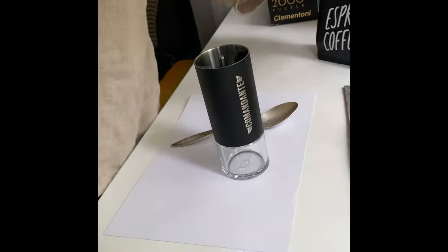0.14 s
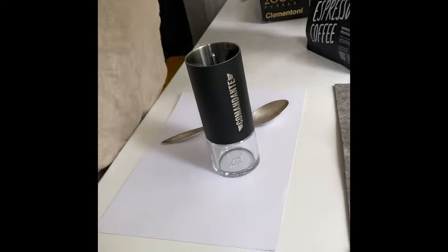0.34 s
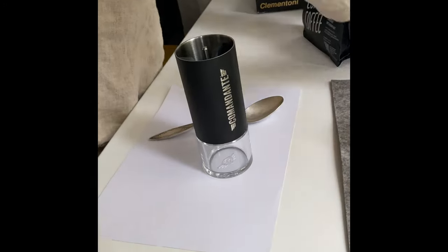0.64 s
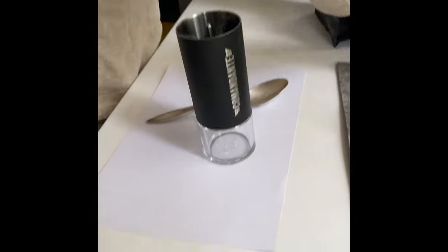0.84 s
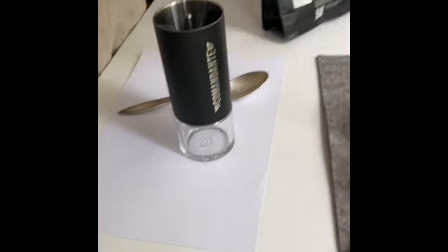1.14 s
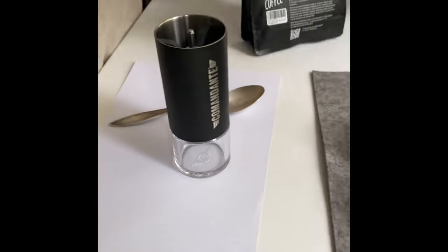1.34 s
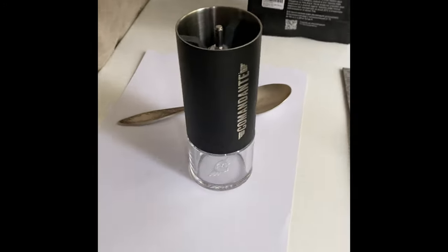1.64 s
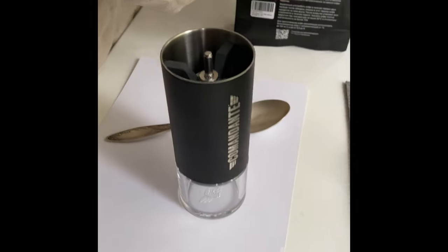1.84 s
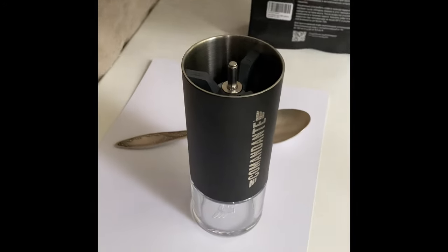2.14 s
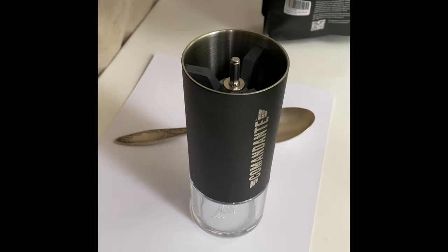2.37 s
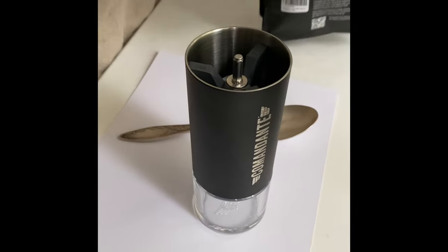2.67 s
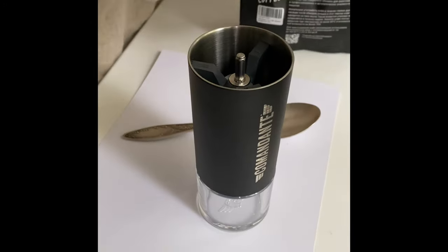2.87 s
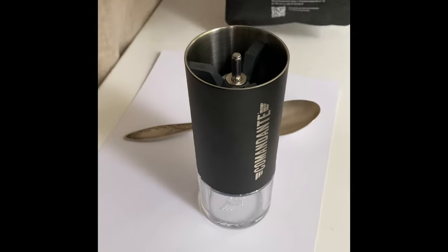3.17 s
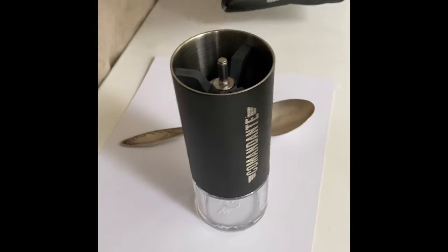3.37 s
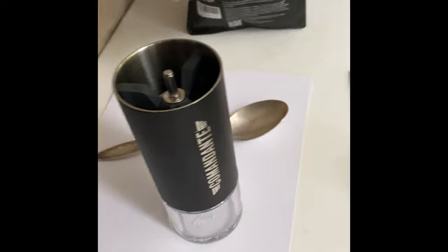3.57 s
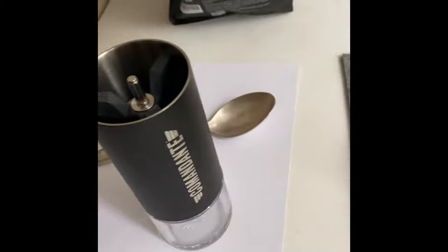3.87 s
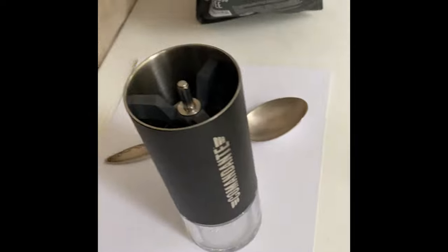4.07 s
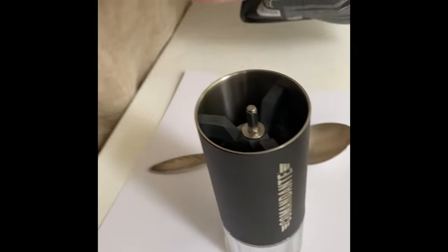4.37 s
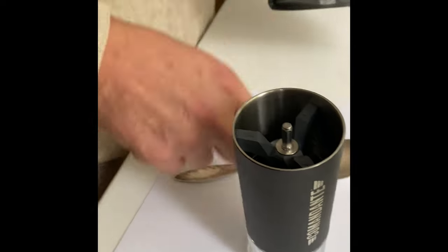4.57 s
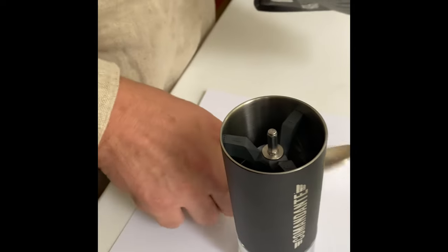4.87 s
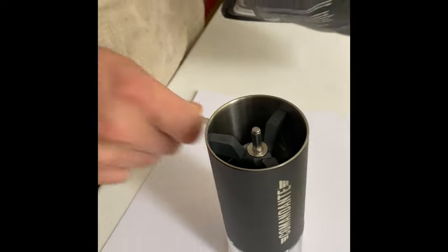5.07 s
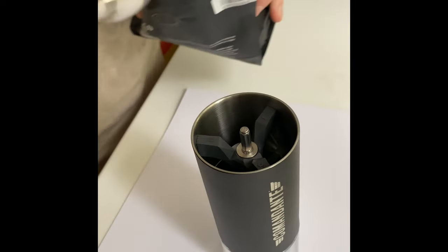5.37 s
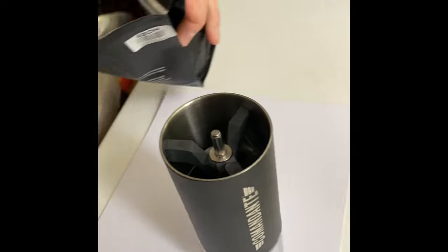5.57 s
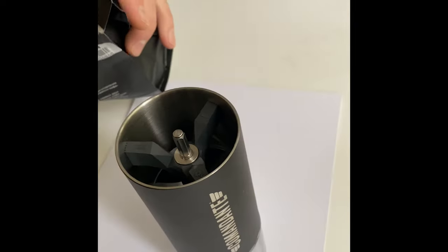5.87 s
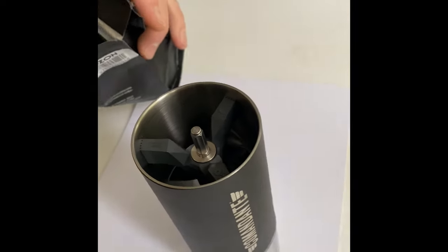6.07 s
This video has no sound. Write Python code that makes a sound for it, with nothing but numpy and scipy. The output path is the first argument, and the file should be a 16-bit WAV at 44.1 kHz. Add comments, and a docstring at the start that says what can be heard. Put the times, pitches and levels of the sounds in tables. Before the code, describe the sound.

A stiff foil coffee bag crackles and snaps sharply close by, thumps onto a table, then a spoon digs in and beans rattle.

```python
"""Foil snaps and crinkles close by: a stiff bag of coffee beans is picked up, opened and shifted on a table.
Bursts of force ring resonances for the creases, decaying sines make panels boom and the table thud.
Then a spoon is lifted and pushed into the tipped bag; beans slide and rattle as streams of tiny clicks.
The place is a small room, with a hand grinder on the table and a phone with two microphone ports close by.
The ports hear direct sound shifted in phase, a quick spray of reflections, and the ring of the room."""
import sys
import numpy as np
from scipy import signal
from scipy.fft import rfft, irfft, next_fast_len
from scipy.io import wavfile
from scipy.ndimage import uniform_filter1d

SR = 44100
rng = np.random.default_rng(int(sys.argv[2]) if len(sys.argv) > 2 else 0)


def output_pcm(signal):
    """Save a mono or channel-first signal as 16-bit PCM at the path in sys.argv[1].

    Samples are clipped to [-1, 1] before scaling.
    """
    pcm = np.clip(np.atleast_2d(signal).T, -1, 1) * 32767
    wavfile.write(sys.argv[1], SR, np.round(pcm).astype(np.int16))


N = 273861  # length in samples

# Levels below are settings before the *_db trims of the functions that use them.
# sharp contacts, mostly foil snapping:
# [t/s, crack level/dB, crack f/Hz, treble re crack/dB, panel boom level/dB, panel f/Hz]
SNAPS = [(0.21, -18, 2600, -7.5, -35, 450), (0.27, -30, 1750, -21, -38, 406),
         (0.41, -26.5, 5070, 2.5, -34.5, 420), (0.445, -19, 1978, -22, -35, 572),
         (0.795, -20, 2830, -6, -31.5, 370), (0.8556, -14.5, 1162, -19.5, -24.5, 490),
         (0.8706, -18.5, 1260, -11, -27, 528), (0.88, -27.5, 1270, -42, -32, 487),
         (0.9014, -11.5, 2190, 0.5, -29.5, 640), (0.924, -30.5, 1700, -11, -42, 523),
         (0.935, -29.5, 930, -6, -32, 453), (0.943, -26, 1110, -24, -42, 586),
         (0.96, -25, 1037, -25, -40, 465), (0.978, -27, 1720, -5, -34.5, 423),
         (0.993, -22, 2350, -7, -37, 540), (1.095, -31, 2500, -60, -42.5, 426),
         (1.513, -28.5, 2320, -6, -31, 487), (1.599, -30, 2070, -45, -38.5, 393),
         (1.731, -33, 1910, -25, -39, 670), (1.694, -21.5, 3950, -51, -37.5, 386),
         (1.751, -32, 856, -20, -25.5, 403), (2.062, -19.5, 2060, -11.5, -31, 200),
         (2.17, -25.5, 2220, -29, -43, 396), (2.211, -25, 1290, -19, -30, 447),
         (2.223, -12, 3200, -16, -34, 202), (2.2517, -2.5, 4640, -8.5, -27, 380),
         (2.268, -18.5, 1270, -23, -28, 184), (2.321, -22.5, 2190, -36, -43.5, 400),
         (2.3408, -14, 2750, -30, -21.5, 347), (2.36, -12.5, 2060, -11, -28, 537),
         (2.391, -15.5, 3100, -13, -35.5, 460), (2.407, -16, 2670, -9, -37.5, 400),
         (2.41, -7, 2600, 1, -26, 253), (2.418, -38.5, 1480, -21.5, -27, 414),
         (2.461, -17, 2450, -46, -46, 259), (2.507, -30, 2200, -56, -41.5, 576),
         (2.793, -28.5, 2360, -11, -40.5, 406), (2.809, -33.5, 1880, -19, -30.5, 343),
         (2.843, -27.5, 2180, -46, -44.5, 172), (2.957, -36, 1144, -32, -31.5, 409),
         (3.246, -25.5, 2180, -28, -45, 190), (3.275, -23, 2970, -24.5, -31, 379),
         (3.29, -20.5, 2600, -35.5, -30.5, 238), (3.323, 0, 2712, -12, -21, 269),
         (3.3293, -16.5, 1166, -23.5, -26, 379), (3.358, -6, 2078, -3.5, -21.5, 271),
         (3.365, -16.5, 2400, -2, -28, 297), (3.506, -36.5, 1654, -38, -40, 504),
         (3.527, -32, 1110, -18, -35, 266), (3.56, -21, 3220, -10, -34, 541),
         (3.702, -23.5, 2380, -9, -31.5, 200), (4.1055, -5.5, 3500, -12, -49.5, 187),
         (4.125, -17, 2150, -14.5, -31, 241), (4.1672, -22.5, 3110, -46, -40.5, 166),
         (4.2075, -14, 2360, -15.5, -29, 223), (4.254, -23, 2570, -28, -40.5, 299),
         (4.284, -38.5, 1062, -11, -34, 403), (4.428, -25, 1560, -14, -25.5, 190.5),
         (6.167, -29.5, 1450, -4, -32, 144)]
# soft buckling of a bag panel: [t/s, level/dB, f/Hz]
BUCKLES = [(0.018, -32.5, 480), (0.192, -33, 480), (0.228, -30.5, 455), (0.274, -31.5, 233),
           (0.322, -27.5, 392), (0.387, -25, 467), (0.505, -29.5, 430), (0.658, -38, 376),
           (1.182, -31.5, 258), (1.3, -31, 183), (1.342, -31, 397), (1.512, -30, 394), (1.549, -33.5, 378),
           (1.926, -31.5, 350), (2.796, -26.5, 410), (3.054, -30, 374), (3.138, -32.5, 186),
           (3.229, -28, 200), (3.392, -30.5, 348.4)]
# modes of a buckling panel: [multiple of its f, level/dB, t60/s]
BOOM_MODES = [(.62, -1, 0.036), (1.001, 5.5, 0.046), (1.45, 6, 0.022), (2.1, -9, 0.038)]
# fingers squeezing the bag: [t/s, length/s, last crinkle level/dB, build-up/dB, crispness re crinkle/dB]
SQUEEZES = [(0.0, 0.0042, -39.5, -21, -10.5), (0.07, 0.118, -50.5, 4.5, -8), (0.176, 0.046, -40, 15, -5),
            (0.276, 0.19, -50.5, -4.5, -4), (0.612, 0.24, -48.5, 7.5, -4), (0.864, 0.026, -31.5, 0.5, -9),
            (0.895, 0.094, -38.5, -1, -3.5), (1.11, 0.45, -40.5, 13, -4), (1.634, 0.21, -57, -7.5, -3),
            (1.876, 0.38, -52.5, 0.5, -2.5), (2.205, 0.2, -37, 4, -7.5), (2.448, 0.0772, -47, -1.5, -14.5),
            (2.63, 0.17, -44.5, 4, -5.5), (2.966, 0.0785, -43.5, 18, -8.5),
            (3.118, 0.099, -54.5, -5, -11.5), (3.208, 0.16, -36, 10.5, -2), (3.491, 0.098, -43.5, 10, -9.5),
            (3.684, 0.15, -52.5, -8, -9.5), (3.952, 0.15, -59.5, -1.5, -3), (4.09, 0.064, -44.5, -5, -6),
            (4.189, 0.027, -41, 1, -10.5), (4.299, 0.024, -49.5, 14.5, 3), (4.402, 0.015, -43, 31, -13.5),
            (4.561, 0.19, -68, -10, -7), (4.849, 0.22, -61.5, 10, 6), (5.027, 0.32, -61.5, 6, -3.5),
            (5.429, 0.093, -72.5, -2, 13), (5.555, 0.095, -49.5, 0.5, -4.5)]
# colouring of the foil creases: [f/Hz, level/dB]
FOIL = [(300, 4), (700, 4), (1300, 0), (2600, 2), (3700, -9.5), (6000, -20)]
# colouring of the finest, crisp creases: [f/Hz, level/dB]
CRISP = [(2000, -2.5), (3600, 2), (5200, -0.5), (6400, 1), (7400, -9.5), (9000, -4), (11800, -8.5),
         (13500, -13)]
# resonances of the rubbed bag: [f/Hz, width/Hz, level/dB]
PANELS = [(264, 57, 0.5), (304, 72, 0.5), (398, 34, -0.5), (494, 73, -6.5), (679, 43, -4.5)]
# beans sliding: a rush as the spoon digs in, then a steady rattle that swells at the end:
# [t/s, rattle level/dB, hiss on foil level/dB]
BEANS = [(5.64, -47, -39), (5.675, -34, -37), (5.74, -41, -45), (6.02, -40, -43.5), (6.12, -42.5, -43),
         (6.21, -37.5, -40)]
# single beans dropping: [t/s, level/dB, f/Hz]
CLACKS = [(5.753, -22.5, 1710), (5.958, -26.5, 1454), (6, -28.5, 1680), (6.014, -27, 960),
          (6.205, -23, 2530)]
# colouring of the bean rattle: [f/Hz, level/dB]
RATTLE = [(150, 11.5), (330, 10), (490, 5), (750, 3.5), (1100, -3), (1500, 1), (2050, -5), (2550, 3.5),
          (3300, -5.5), (5500, -17), (8000, -45)]
# colouring of beans hissing on foil: [f/Hz, level/dB]
BEAN_HISS = [(3000, -7.5), (6000, 3.5), (7400, -0.5), (9000, 4), (11800, 0.5), (13500, 9), (16000, -4.5)]
# spoon knocking against the bag as it goes in: [t/s, level/dB]
KNOCKS = [(5.5972, -16), (5.6274, -12.5)]
# what rings at such a knock: [f/Hz, level/dB, t60/s]
KNOCK_MODES = [(215, -9.5, 0.058), (1714, 3.5, 0.012), (1950, 15, 0.0061), (2920, 10.5, 0.0072)]
# bag put down and rocking on the table: [t/s, level/dB]
LANDINGS = [(4.208, -26), (4.285, -43), (4.429, -33)]
# what rings at a landing: [f/Hz, level/dB, t60/s]
LANDING_MODES = [(251.6, 3.5, 0.12), (540, 4, 0.033), (960, 0, 0.055), (1400, -3, 0.04), (1590, -11, 0.03),
                 (2260, -19, 0.031), (2750, -5, 0.042)]
# squeaks of foil and spoon, low groans of the table as the bag is dragged:
# [t/s, length/s, f/Hz, half the width of each of two filters in series/Hz, level/dB]
SCRAPES = [(0.428, 0.42, 51.1, 6, -44), (0.52, 0.23, 90, 6.6, -51), (0.83, 0.16, 5200, 360, -43),
           (0.95, 0.081, 5100, 280, -40.5), (1.477, 0.13, 4520, 300, -44.5), (1.51, 0.094, 2530, 150, -40),
           (1.561, 0.25, 2560, 140, -51.5), (3.471, 0.7, 123.5, 7.9, -50), (3.7, 0.17, 122, 10, -40),
           (3.621, 0.56, 271, 31, -54), (3.672, 0.35, 2530, 110, -65), (5.552, 0.048, 790, 90, -43),
           (5.642, 0.051, 11700, 380, -31.5), (6.11, 0.057, 11600, 520, -45.5)]
# dull bumps on the table: [t/s, level/dB, f/Hz]
THUDS = [(.004, -50.5, 54.1), (3.53, -34.5, 64.8), (4.094, -19, 64.7), (4.197, -24.5, 60.4),
         (4.609, -23.5, 56.5), (5.149, -25, 70.8), (5.642, -21.5, 55.8), (6.156, -20, 64.3)]
# bag or hand sliding on the table: [t/s, length/s, level/dB]
SLIDES = [(0.099, 0.39, -49.5), (1.323, 0.044, -43), (1.497, 0.036, -38), (2.235, 0.171, -42),
          (2.788, 0.016, -40.5), (3.253, 0.16, -51), (3.502, 0.26, -46.5), (3.885, 0.076, -46),
          (4.081, 0.17, -38.5), (4.598, 0.022, -38.5), (4.673, 0.091, -45.5), (5.624, 0.048, -40)]
# colouring of the table rumble: [f/Hz, level/dB]
TABLE = [(50, -21.5), (100, 6), (130, 5.5), (210, 5), (300, -21.5), (600, -58)]
# sway of the hand-held phone: [t/s, level/dB]
SWAYING = [(0.0, -37.5), (0.4, -55), (1.0, -63), (3.4, -60.5), (3.6, -50), (3.95, -62), (4.15, -40),
           (4.5, -62), (5.2, -52.5), (5.5, -68.5), (5.67, -37.5), (5.95, -64.5), (6.21, -48)]
# colouring of that sway: [f/Hz, level/dB]
SWAY = [(15, -11.5), (30, -11), (55, 10), (85, -6.5), (200, -40.5)]
# phase by which the left port leads the right: [f/Hz, phase/rad]
PORT_PHASE = [(20, .1), (140, -.17), (400, -.33), (520, -.85), (720, -1.9), (880, .7), (1450, .15),
              (2000, .45), (3000, 1.7), (3900, .7), (5100, .45), (6900, 3), (7700, 3.3), (10000, 6.2),
              (11000, 6.3), (13000, 9.4), (14200, 9.6), (16000, 12)]
# how much louder direct sound is at the left port: [f/Hz, level/dB]
PORT_BALANCE = [(110, 1), (200, -1), (420, 1.5), (700, -2), (1290, -3.5), (2380, 0), (4400, -1.5),
                (8120, 0), (15000, 0.5)]
# decay of the room's ring, a negative value meaning none: [f/Hz, t60/s]
ROOM_T60 = [(100, -1.35), (600, 0.25), (3000, 0.14), (14000, 0.45)]
# strength of the room's ring: [f/Hz, level/dB]
ROOM_DB = [(100, -15), (400, -11.5), (1000, -5.5), (3000, -9.5), (14000, -20.5)]
# colouring of the quiet room: [f/Hz, level/dB]
ROOM_TONE = [(25, -8.5), (120, -3.5), (250, 5), (600, -11.5), (1200, -24.5), (4000, -24.5), (11000, -32),
             (16000, -27.5)]

SNAP_CYCLES = 1.5  # a crease gives way in this many cycles of its pitch: small creases snap faster
SPIKE_DB = -7  # the instant when the crease flips, re the burst
UNPITCHED_DB = -2.5  # share of a foil crack outside its resonance
# shiver after a snap: dB at the reference crack level and pitch,
# dB lost per dB of a louder crack, dB lost per octave of a higher pitch
SHIVER_DB, SHIVER_REF_DB, SHIVER_REF_HZ = -5, -31, 1762
SHIVER_LOSS, SHIVER_DB_PER_OCTAVE = 0.15, 5.5
# a push takes hold in a moment plus a share of its length, and dies away when the hand lets go
TAKE_HOLD_S, TAKE_HOLD_SHARE, LET_GO_DB_PER_S = 0.0032, 0.21, 175.5
RESTING_DB = -74.5  # crinkle of the bag when barely touched
# panel murmur: dB at a crinkle of the reference dB, then dB per dB of crinkle
RUB_DB, RUB_REF_DB, RUB_FOLLOWS = -45, -47, 0.8
TICKS_PER_S, TICK_DB = 28, -16  # lone louder creases, dB re the dense crinkle
BEAN_TICKS_PER_S, BEAN_TICK_DB = 60, -13.5  # lone louder beans, dB re the dense rattle
LIFT_S, LIFT_DB = 4.9938, -35.5  # the spoon's tick as it is picked up
# the spoon's faint ring as it slides off the paper
SING_S, SING_LENGTH_S, SING_HZ, SING_RISE_HZ, SING_DB = 5.228, 0.095, 4290, 260, -61
ROOM_TONE_DB = -69.5
CUTOFF_HZ = 15900


def snaps(crack_db=-8, boom_db=2, buckle_db=-3, tick_db=-15):
    """Sharp snaps crack and boom; soft buckles boom with a faint dull tick."""
    out = np.zeros(N)
    for s, db, hz, treble_db, panel_db, panel_hz in SNAPS:
        louder_db = db - SHIVER_REF_DB
        octaves = np.log2(hz / SHIVER_REF_HZ)
        shiver_db = SHIVER_DB - SHIVER_LOSS * louder_db - SHIVER_DB_PER_OCTAVE * octaves
        add(out, s, from_db(db + crack_db) * crack(hz, treble_db, shiver_db, UNPITCHED_DB))
        add(out, s, from_db(panel_db + boom_db) * boom(panel_hz, rise_s=0.0025))
    for s, db, hz in BUCKLES:
        add(out, s, from_db(db + buckle_db) * boom(hz, rise_s=0.0014))
        tick = crack(hz=1056, treble_db=-20.5, shiver_db=-19.5, broad_db=-10.5)
        add(out, s, from_db(db + tick_db) * tick)
    return out


def crack(hz, treble_db, shiver_db, broad_db, shiver_t60=0.066, width=0.24, low_hz=550,
          top_hz=5500, top_fall=0.064, edge_hz=8500, edge_top_hz=12600):
    """A crease gives way within a millisecond or two, then the foil around it shivers in tiny slips."""
    t = np.arange(SR // 4) / SR
    snap_s = SNAP_CYCLES / hz
    burst = t / snap_s * np.exp(1 - t / snap_s)
    slips = rms_one(uniform_filter1d(rng.exponential(1, len(t)) ** 3, size=50))
    shiver = from_db(shiver_db) * (1 - np.exp(-t / snap_s)) * dying(t, shiver_t60) * slips
    force = burst + shiver
    force[np.argmax(burst)] += from_db(SPIKE_DB) * np.linalg.norm(burst)
    # random signs turn the force into three independent noises
    pitched, broad, edge = force * rng.choice([-1, 1], (3, len(t)))
    # brighter contacts and smaller creases reach higher
    reach_hz = top_hz * np.exp(top_fall * treble_db) + hz
    pitched = rms_one(cut(resonate(pitched, hz, width * hz), reach_hz, "low"))
    broad = rms_one(cut(cut(broad, low_hz, "high"), reach_hz, "low"))
    edge = rms_one(cut(cut(edge, edge_hz, "high", order=4), edge_top_hz, "low", order=4))
    mix = pitched + from_db(broad_db) * broad + from_db(treble_db) * edge
    return mix * np.sqrt(np.mean(force ** 2))


def boom(hz, rise_s):
    """A bag panel flips over and rings briefly in a few modes."""
    t = np.arange(SR // 4) / SR
    modes = 0
    for multiple, db, t60 in BOOM_MODES:
        wave = np.sin(2 * np.pi * (hz * multiple * t + rng.random()))
        modes = modes + from_db(db) * dying(t, t60) * wave
    return modes * (1 - np.exp(-t / rise_s))


def crinkle(clump_db=3, patchy_db=4, crease_width=0.17):
    """Fingers work the foil: creases of many sizes tick in clumps and the rubbed panels murmur."""
    effort, crispness = from_db(RESTING_DB), from_db(RESTING_DB)
    for s, length, db, build_db, treble_db in SQUEEZES:
        squeeze = from_db(db) * push(s, length, build_db)
        effort = np.maximum(effort, squeeze)
        crispness = np.maximum(crispness, from_db(treble_db) * squeeze)
    clumps = from_db(clump_db * drift(70))
    creases = 0
    for hz in np.geomspace(600, 4800, 16):  # each crease size rings at its own pitch
        patches = from_db(patchy_db * drift(35))
        clicks = grains(per_s=220, spread_db=0.0)
        creases = creases + patches * resonate(clicks, hz, crease_width * hz)
    ticks = from_db(TICK_DB) * rms_one(grains(TICKS_PER_S, spread_db=1.0))
    foil = effort * coloured(rms_one(creases * clumps) + ticks, FOIL)
    crisp = crispness * coloured(grains(per_s=3300, spread_db=1.0) * clumps, CRISP)
    slips = grains(per_s=900, spread_db=2.5) * clumps
    rub = 0
    for k, (hz, width, db) in enumerate(PANELS):  # neighbouring panels move in opposite phase
        rub = rub + (-1) ** k * from_db(db) * resonate(slips, hz, width)
    rub_level = from_db(RUB_DB) * (effort / from_db(RUB_REF_DB)) ** RUB_FOLLOWS
    return foil + crisp + rub_level * rms_one(rub)


def push(s, length, build_db=0):
    """Gain of one push of the hand: takes hold, builds or eases to 1 at letting go, then dies away."""
    t = np.arange(N) / SR - s
    held = np.clip(t / length, 0, 1)
    hold = np.clip(t / (TAKE_HOLD_S + TAKE_HOLD_SHARE * length), 0, 1)
    let_go_db = LET_GO_DB_PER_S * np.clip(t - length, 0, 1)
    return hold * from_db(build_db * (held - 1) - let_go_db)


def beans(rattle_db=-1.0, start_s=5.64, rise_s=0.0036, clump_db=2.5, bean_width=0.11,
          patchy_db=0.3, contact_db=-4, clack_db=-10):
    """Beans tumble in slides, knock at many pitches and tick on the foil; a few drop with a clear clack."""
    rattle_level, hiss_level = in_time(BEANS)
    slides = from_db(clump_db * drift(60))
    bean_knocks = 0
    for hz in np.geomspace(700, 4200, 26):
        patches = from_db(patchy_db * drift(14))
        clicks = grains(per_s=250, spread_db=2.0)
        bean_knocks = bean_knocks + patches * resonate(clicks, hz, bean_width * hz) / np.sqrt(hz)
    contacts = grains(per_s=880, spread_db=-3.5)
    ticks = from_db(BEAN_TICK_DB) * rms_one(grains(BEAN_TICKS_PER_S, spread_db=7.0))
    dense = (rms_one(bean_knocks) + from_db(contact_db) * rms_one(contacts)) * slides
    rattle = coloured(rms_one(dense) + ticks, RATTLE)
    hiss = coloured((contacts + grains(per_s=1500, spread_db=0)) * slides, BEAN_HISS)
    flow = np.clip((np.arange(N) / SR - start_s) / rise_s, 0, 1)
    out = flow * (from_db(rattle_level + rattle_db) * rattle + from_db(hiss_level) * hiss)
    for s, db, hz in CLACKS:
        add(out, s, from_db(db + clack_db) * crack(hz, treble_db=-13, shiver_db=-20, broad_db=-3))
    return out


def knocks(rise_s=0.0016, tick_db=-6):
    """The spoon meets the full bag: a dry clack over a hollow thump, and the foil ticks."""
    t = np.arange(SR // 4) / SR
    ring = 0
    for hz, db, t60 in KNOCK_MODES:
        ring = ring + from_db(db) * dying(t, t60) * np.sin(2 * np.pi * hz * t)
    ring = ring * (1 - np.exp(-t / rise_s))
    out = np.zeros(N)
    for s, db in KNOCKS:
        tick = crack(hz=1870, treble_db=-16.0, shiver_db=-30.0, broad_db=-7.5)
        add(out, s, from_db(db) * (ring + from_db(tick_db) * tick))
    return out


def landings(rise_s=0.00072):
    """The full bag lands on the table: a dull knock in the modes of the table top."""
    t = np.arange(SR // 4) / SR
    out = np.zeros(N)
    for s, db in LANDINGS:
        ring = 0
        for hz, mode_db, t60 in LANDING_MODES:
            wave = np.sin(2 * np.pi * (hz * t + rng.random()))
            ring = ring + from_db(mode_db) * dying(t, t60) * wave
        add(out, s, from_db(db) * ring * (1 - np.exp(-t / rise_s)))
    return out


def spoon(detune=0.023):
    """The spoon leaves the table with one dry tick, then sings a faint tone that rises and falls."""
    t = np.arange(N) / SR
    arch = np.sin(np.pi * np.clip((t - SING_S) / SING_LENGTH_S, 0, 1))
    # one chance offset of the whole tone's pitch
    hz = (SING_HZ - SING_RISE_HZ * (1 - arch)) * (1 + detune * rng.standard_normal())
    out = from_db(SING_DB) * arch * np.sin(2 * np.pi * np.cumsum(hz) / SR)
    tick = crack(hz=3600, treble_db=-8, shiver_db=-22, broad_db=0, low_hz=900)
    add(out, LIFT_S, from_db(LIFT_DB) * tick)
    return out


def scrapes(slips_per_s=1500):
    """Tiny slips of friction excite one steep-sided resonance for each scrape."""
    out = np.zeros(N)
    for s, length, hz, width, db in SCRAPES:
        swell = np.hanning(int(length * SR))
        slips = grains(slips_per_s, spread_db=2)[:SR]
        rasp = resonate(resonate(slips, hz, 2 * width), hz, 2 * width)
        settled = rasp[-len(swell):]
        add(out, s, from_db(db) * swell * rms_one(settled))
    return out


def table(thud_db=-3, thud_t60=0.24, rise_s=0.0086, upper=1.8, upper_db=-8, leaning_db=-56, sway_db=-1):
    """The table rumbles under leaning and sliding, and swings in two low modes when bumped; the phone sways."""
    t = np.arange(SR // 2) / SR
    sway_level, = in_time(SWAYING)
    drag = from_db(leaning_db)
    for s, length, db in SLIDES:
        drag = np.maximum(drag, from_db(db) * push(s, length))
    sway = from_db(sway_level + sway_db) * coloured(rng.standard_normal(N), SWAY)
    out = sway + drag * coloured(rng.standard_normal(N), TABLE)
    for s, db, hz in THUDS:
        # the upper mode carries the decay twice, so it dies twice as fast
        high = from_db(upper_db) * np.sin(2 * np.pi * hz * upper * t) * dying(t, thud_t60)
        swing = (np.sin(2 * np.pi * hz * t) + high) * dying(t, thud_t60)
        add(out, s, from_db(db + thud_db) * swing * (1 - np.exp(-t / rise_s)))
    return out


def ports(x):
    """Direct sound bends round the phone and reaches its two ports out of phase and unequally loud."""
    size = next_fast_len(N + SR // 10)
    hz = np.fft.rfftfreq(size, 1 / SR)
    halves = np.array([[.5], [-.5]])  # each port takes half the difference: left, right
    phase = np.exp(1j * at_hz(PORT_PHASE, hz) * halves)
    path = phase * from_db(at_hz(PORT_BALANCE, hz) * halves)
    return irfft(rfft(x, size) * path, size)[:, :N]


def scatter(x, scatter_db=-11, scatter_t60=0.025, first_s=0.0008, low_hz=380, top_hz=6500):
    """Table top, grinder and wall: a quick spray, unlike at each port, redrawn at random every 0.1 s."""
    t = np.arange(SR // 20) / SR
    hop = SR // 10  # sprays crossfade at constant power
    out = np.zeros((2, N))
    for start in range(0, N, hop):
        spray = rng.standard_normal((2, len(t))) * dying(t, scatter_t60) * (t > first_s)
        spray = cut(cut(spray, low_hz, "high"), top_hz, "low", order=1)
        response = rms_one(spray) / np.sqrt(len(t))
        piece = x[start:start + 2 * hop]
        piece = piece * np.sqrt(np.hanning(2 * hop))[:len(piece)]
        for port, reflections in zip(out, response):
            add(port, start / SR, signal.fftconvolve(piece, reflections))
    return from_db(scatter_db) * out


def room(x, first_s=0.00073, alike_hz=110):
    """Diffuse reflections die band by band; the bass is alike at both ports."""
    t = np.arange(SR // 2) / SR
    response = 0
    for low in 60 * 2. ** np.arange(9):  # octave bands
        high, hz = min(2 * low, SR / 2 - 1), low * np.sqrt(2)
        band = signal.butter(2, [low, high], "band", fs=SR, output="sos")
        mid, side = signal.sosfilt(band, rng.standard_normal((2, len(t))))
        apart = hz ** 2 / (hz ** 2 + alike_hz ** 2)
        t60 = max(at_hz(ROOM_T60, hz), 1 / SR)
        tail = (mid + side * [[1], [-1]] * apart) * dying(t, t60) * (t > first_s)
        share = np.sqrt(2 * (high - low) / SR / len(t))
        response = response + from_db(at_hz(ROOM_DB, hz)) * rms_one(tail) * share
    return signal.fftconvolve(x[None], response, axes=1)[:, :N]


def room_tone():
    """The quiet room: steady coloured noise."""
    return from_db(ROOM_TONE_DB) * coloured(rng.standard_normal(N), ROOM_TONE)


def grains(per_s, spread_db):
    """Tiny clicks at random times and signs; the spread sets how unequal their sizes are."""
    sizes = from_db(spread_db * np.minimum(rng.exponential(1, N), 4))
    return (rng.random(N) < per_s / SR) * sizes * rng.choice([-1, 1], N)


def drift(rate):
    """Slow chance with about `rate` turns a second; spread 1."""
    knots = rng.standard_normal(4096)
    return np.interp(np.arange(N) / SR * rate, np.arange(len(knots)), knots)


def resonate(x, hz, width_hz):
    """One resonance of gain 1."""
    r = np.exp(-np.pi * width_hz / SR)
    feed = np.array([1, 0, -1]) * (1 - r * r) / 2
    back = [1, -2 * r * np.cos(2 * np.pi * hz / SR), r * r]
    return signal.lfilter(feed, back, x + 1e-18)


def dying(t, t60):
    """Envelope that loses 60 dB in t60."""
    return np.exp(-np.log(1000) * t / t60)


def coloured(x, spectrum):
    """Filter a steady sound by a spectrum table; rms 1."""
    gain = from_db(at_hz(spectrum, np.fft.rfftfreq(N, 1 / SR)))
    return rms_one(irfft(rfft(x) * gain, N))


def cut(x, hz, kind, order=2):
    """Causal low- or high-pass."""
    sos = signal.butter(order, min(hz, SR / 2 - 1), kind, fs=SR, output="sos")
    return signal.sosfilt(sos, x)


def at_hz(points, hz):
    """Read a table on a log-frequency axis."""
    f, value = np.transpose(points)
    return np.interp(np.log(np.maximum(hz, 1)), np.log(f), value)


def in_time(rows):
    """Each column of a curve at every sample."""
    s, *columns = np.transpose(rows)
    return [np.interp(np.arange(N) / SR, s, column) for column in columns]


def from_db(db):
    """Decibels to gain."""
    return 10 ** (np.asarray(db) / 20)


def rms_one(x):
    """Scale to rms 1."""
    return x / np.sqrt(np.mean(x ** 2) + 1e-20)


def add(track, s, sound):
    """Mix a sound in at time s."""
    at = max(round(s * SR), 0)
    track[at:at + len(sound)] += sound[:max(N - at, 0)]


def scene():
    """Bag, beans and spoon close to the phone, over the table, in a quiet small room."""
    near = snaps() + crinkle() + knocks() + landings() + beans() + scrapes() + spoon()
    rumble = table()
    direct = ports(near + rumble + room_tone())
    return direct + scatter(near) + room(near + rumble)


def record(dry):
    """Peaks are rounded, then the top is cut steeply."""
    top_cut = signal.ellip(10, .1, 80, CUTOFF_HZ, fs=SR, output="sos")
    return signal.sosfilt(top_cut, np.tanh(dry))


dry = scene()
out = record(dry)
output_pcm(out)
```